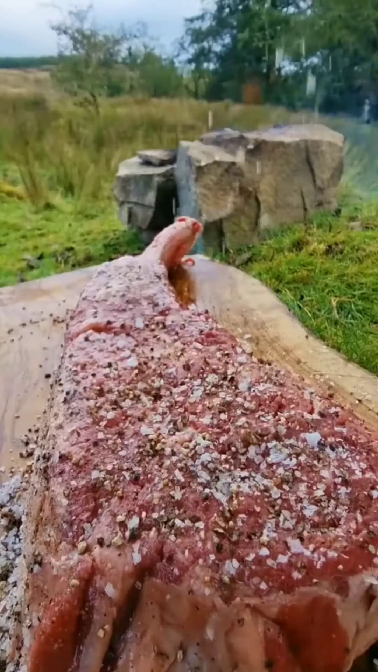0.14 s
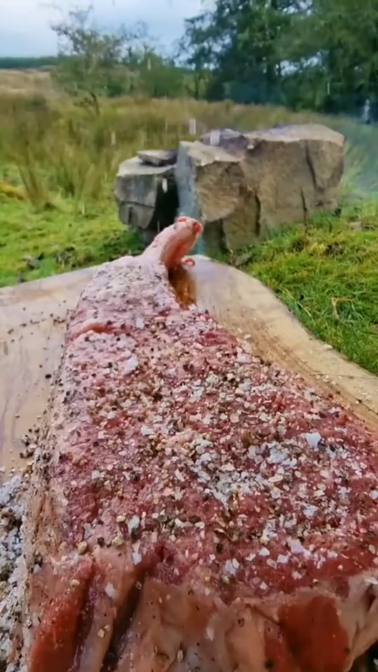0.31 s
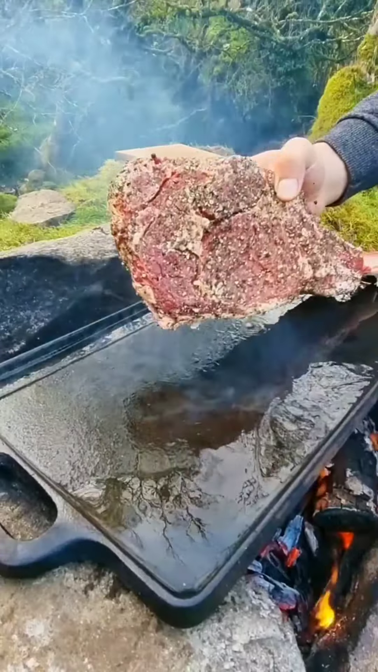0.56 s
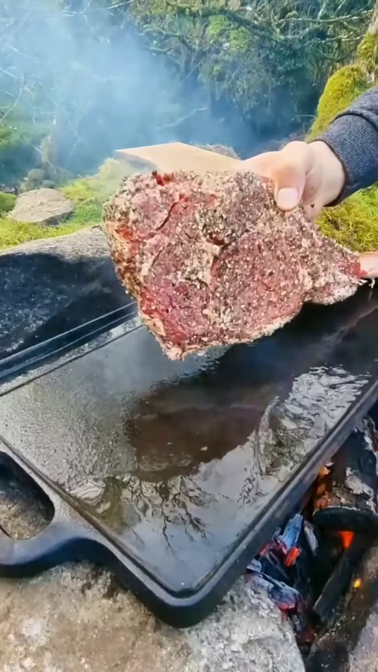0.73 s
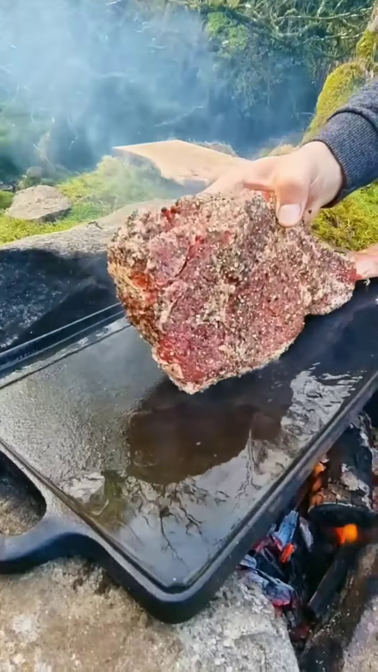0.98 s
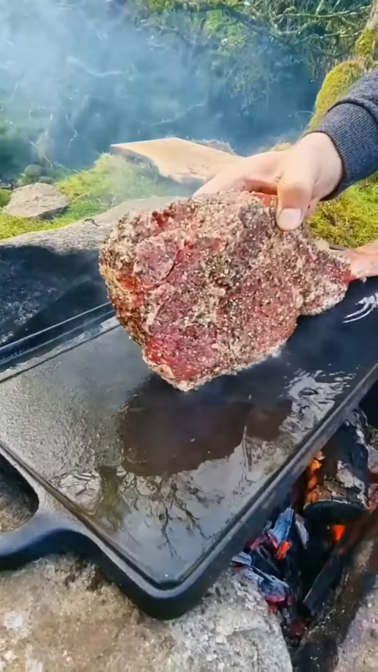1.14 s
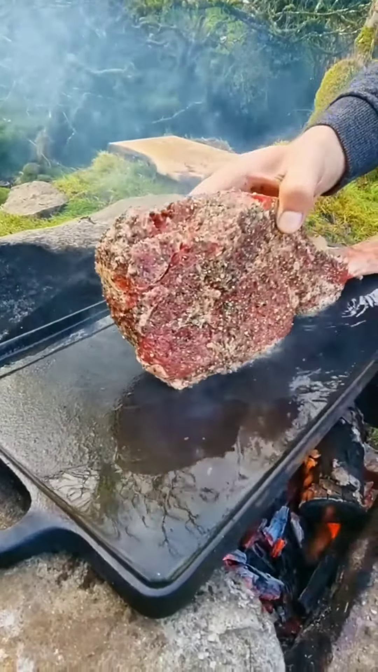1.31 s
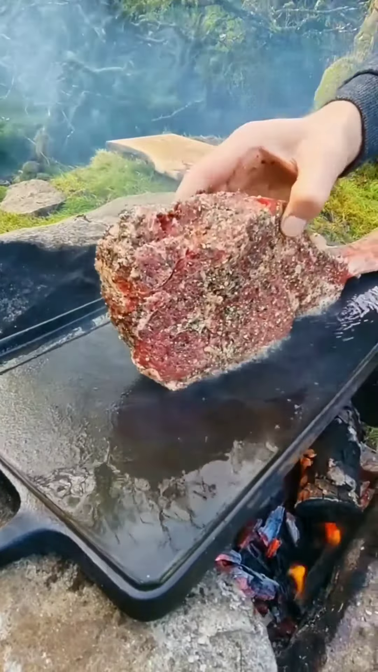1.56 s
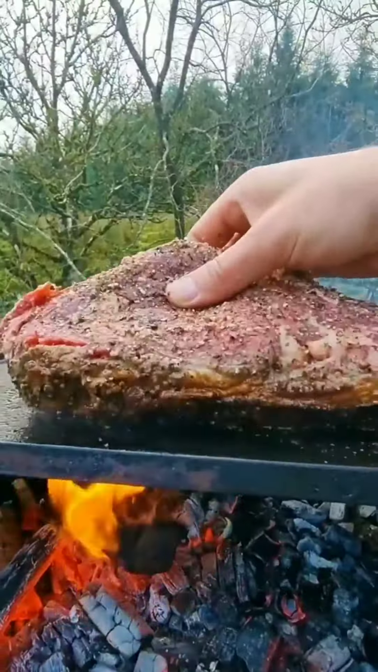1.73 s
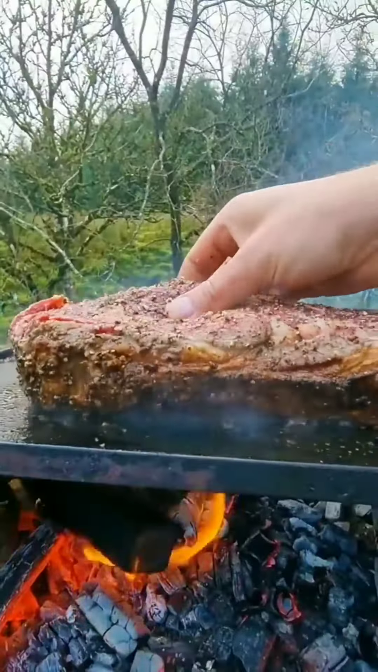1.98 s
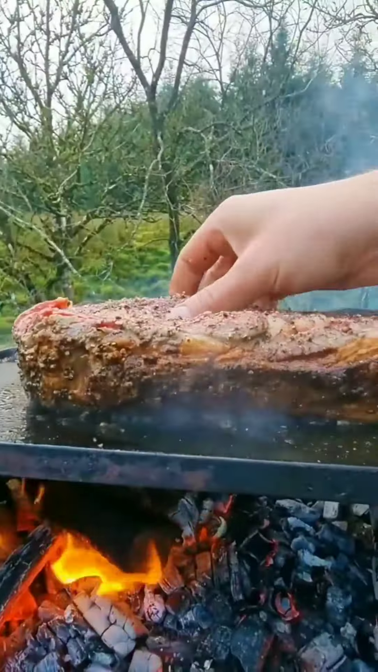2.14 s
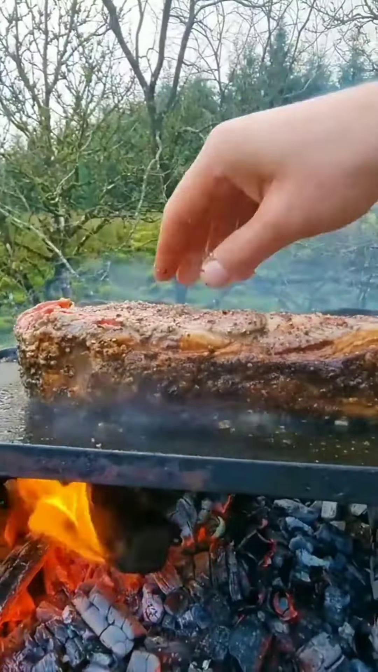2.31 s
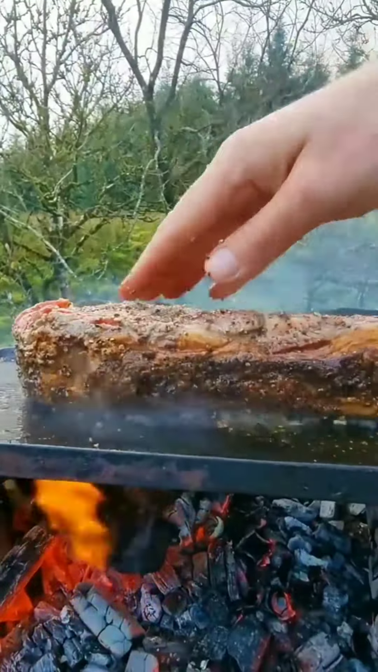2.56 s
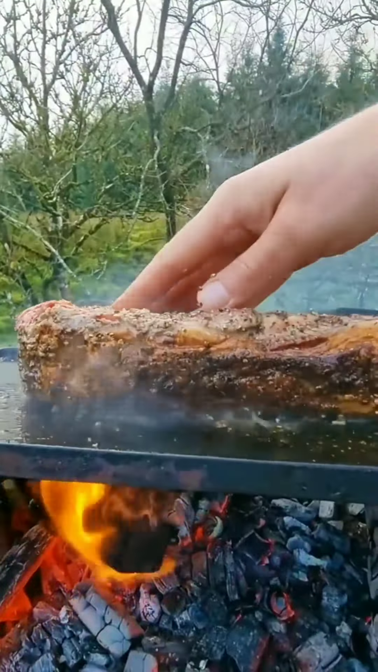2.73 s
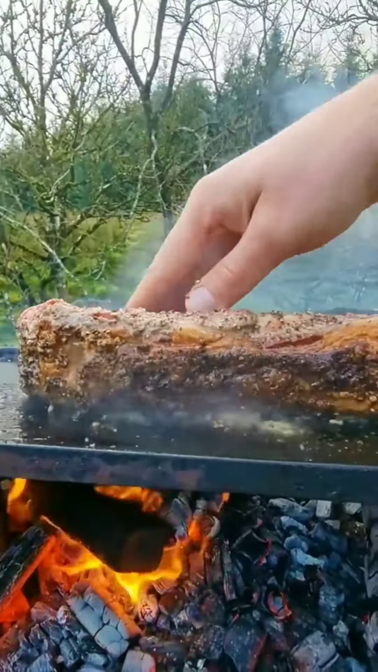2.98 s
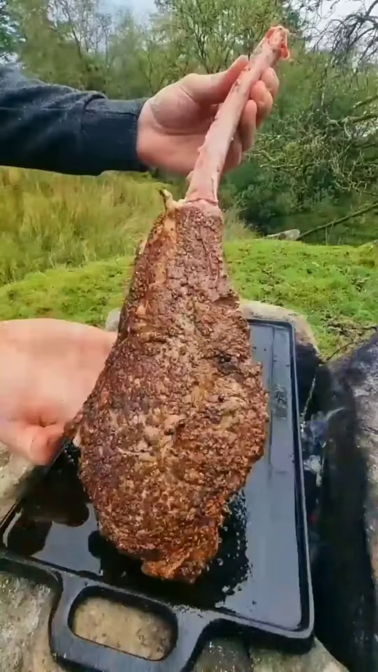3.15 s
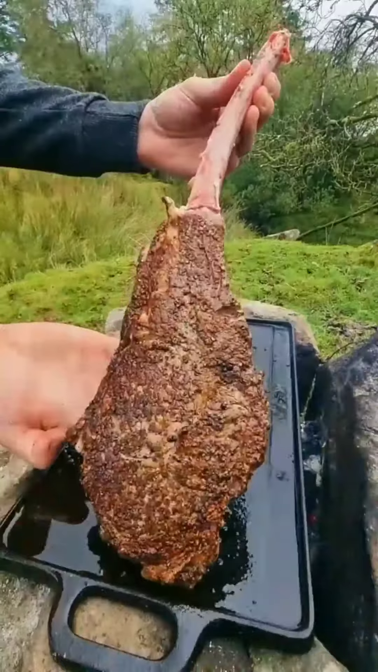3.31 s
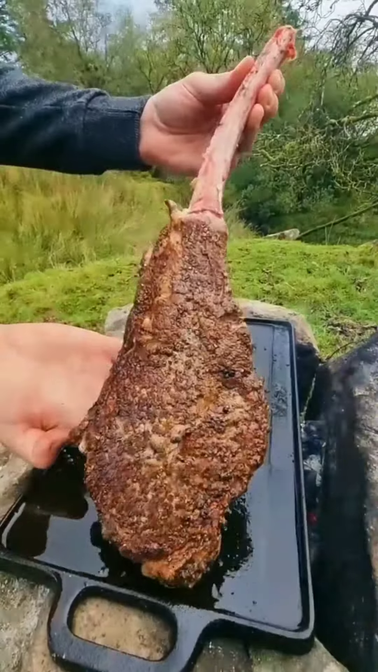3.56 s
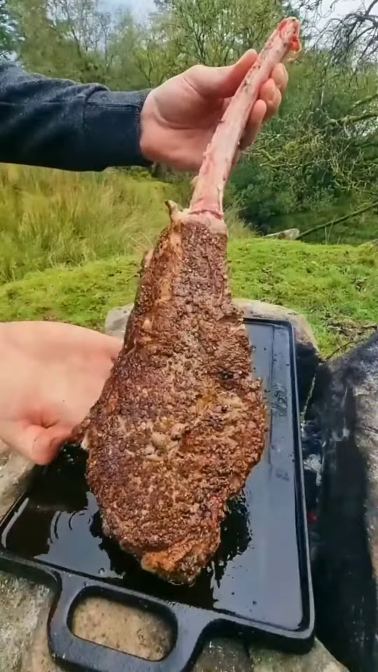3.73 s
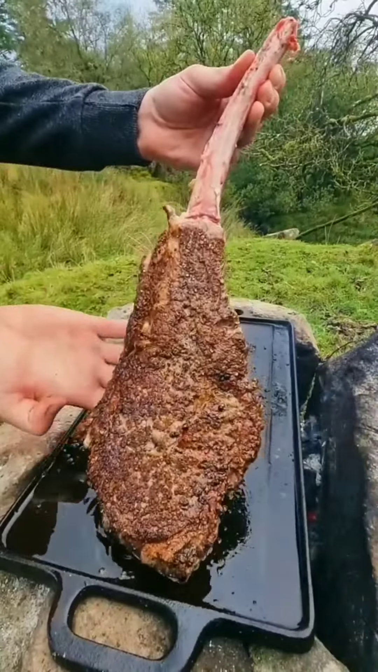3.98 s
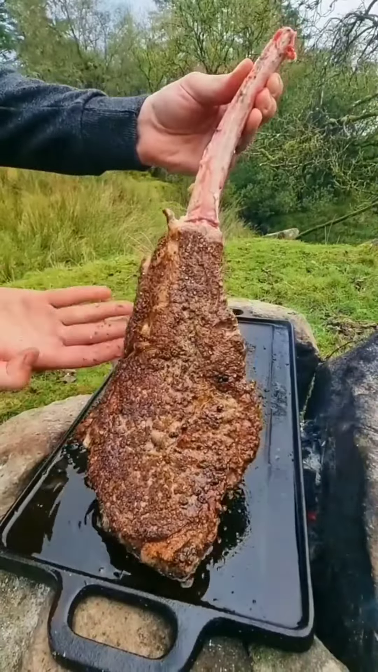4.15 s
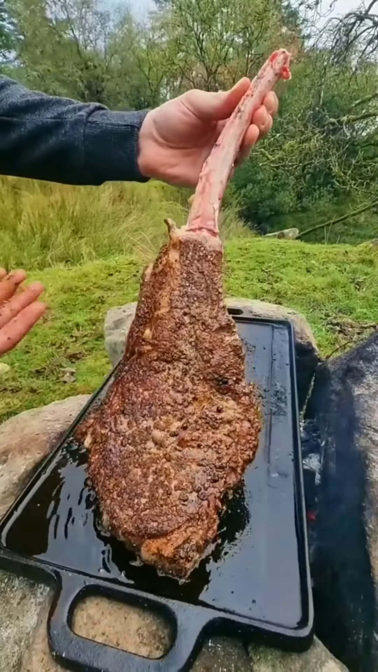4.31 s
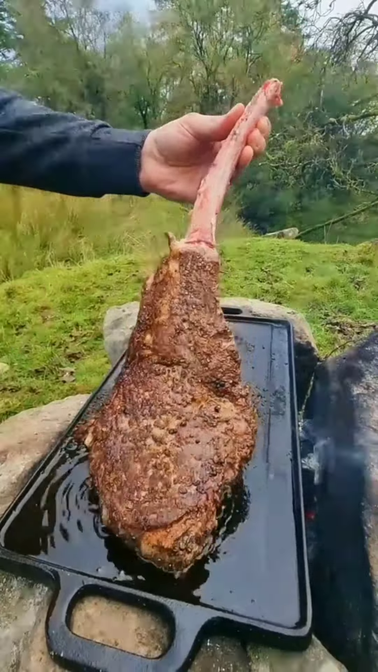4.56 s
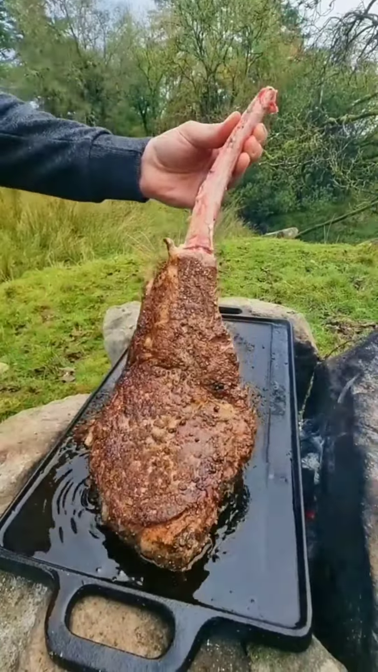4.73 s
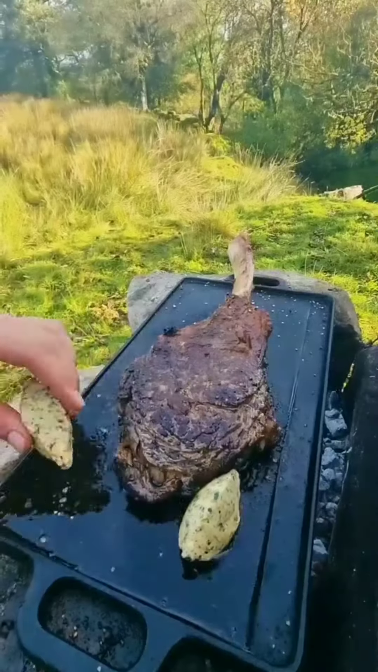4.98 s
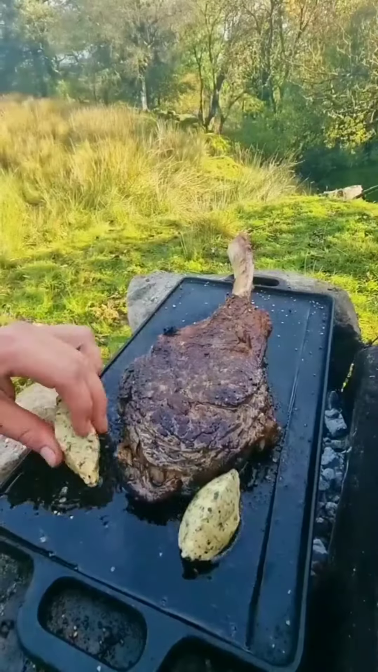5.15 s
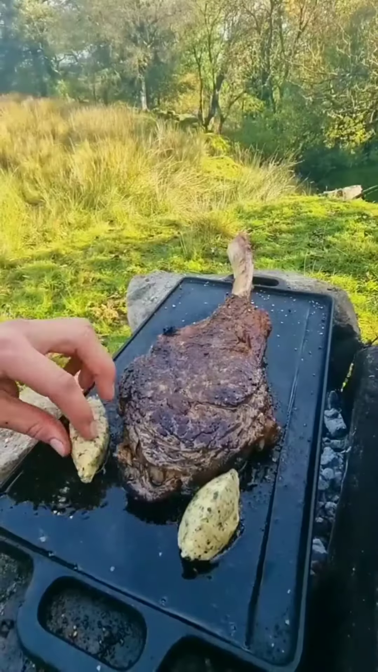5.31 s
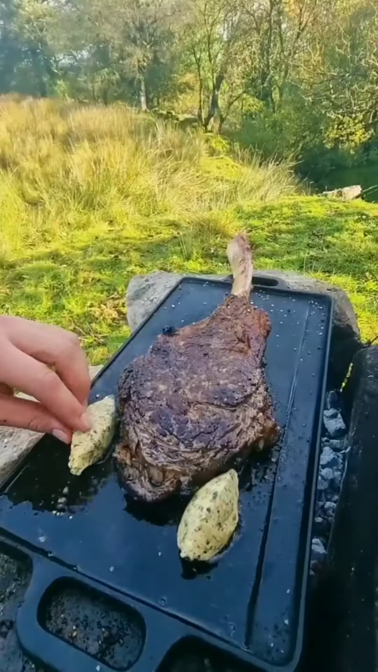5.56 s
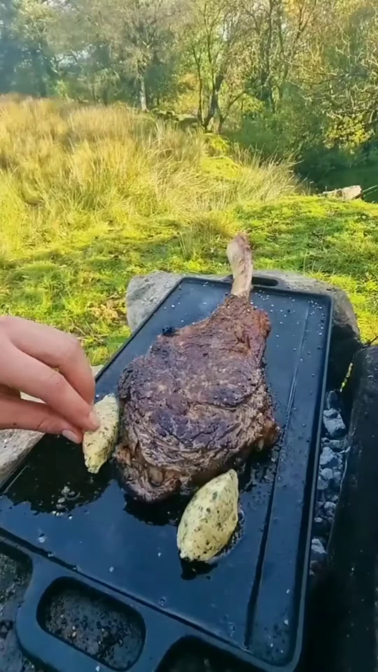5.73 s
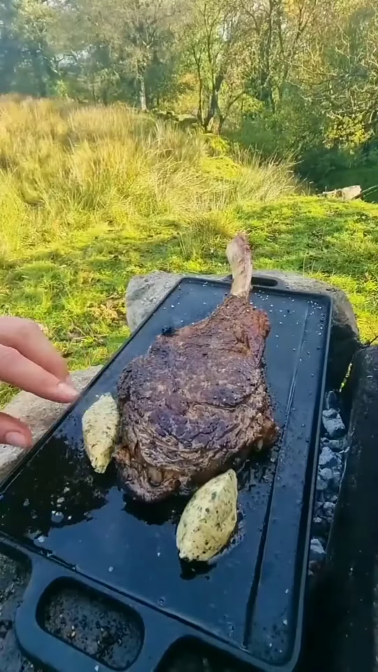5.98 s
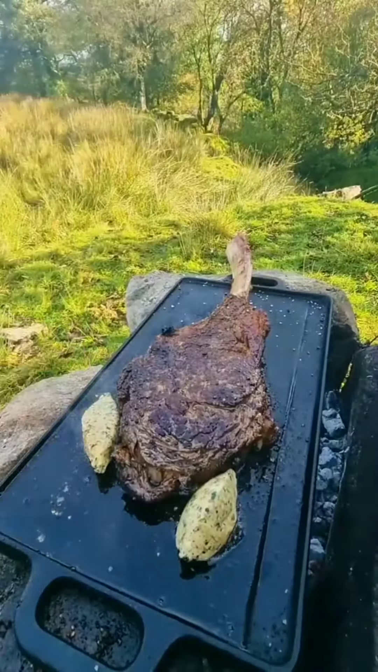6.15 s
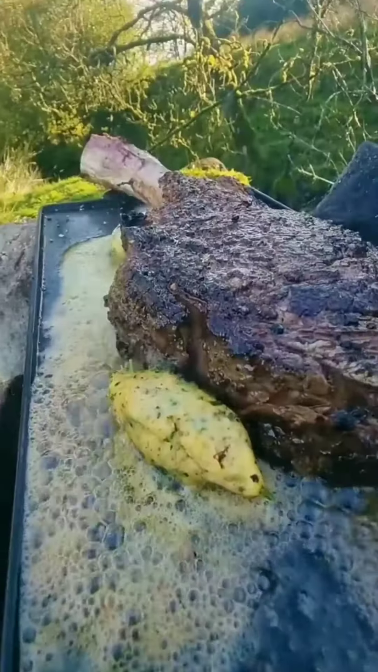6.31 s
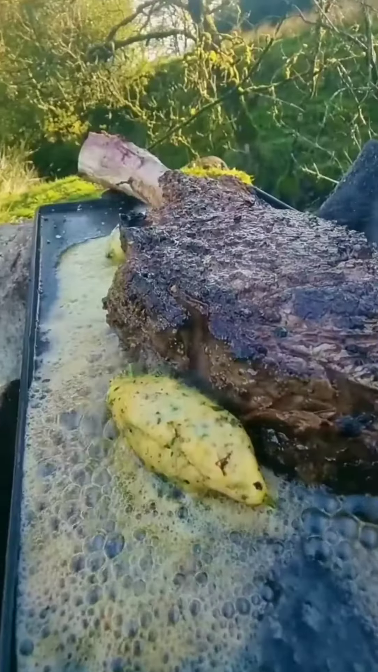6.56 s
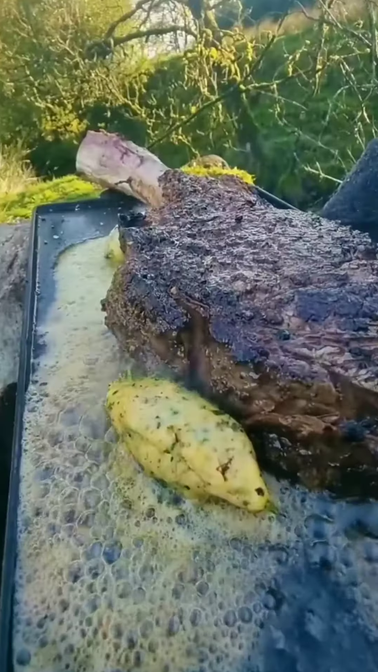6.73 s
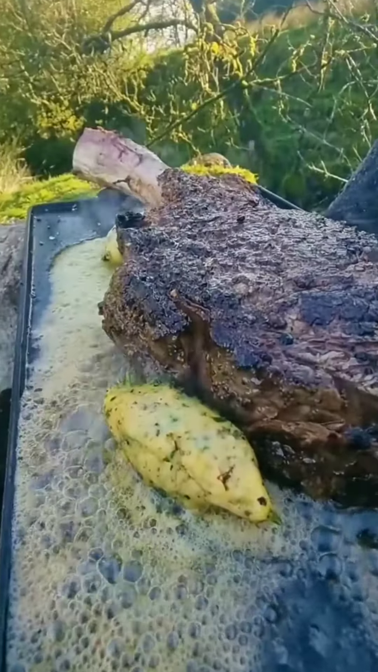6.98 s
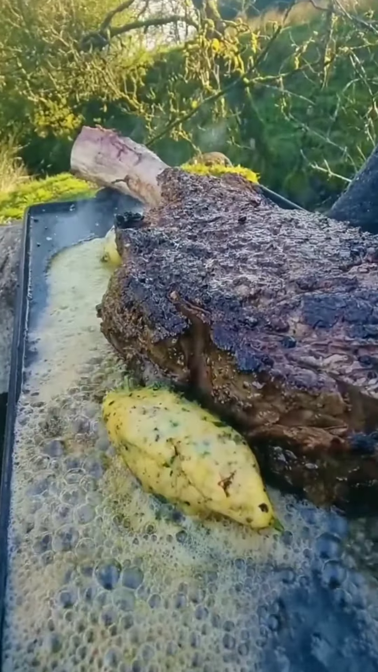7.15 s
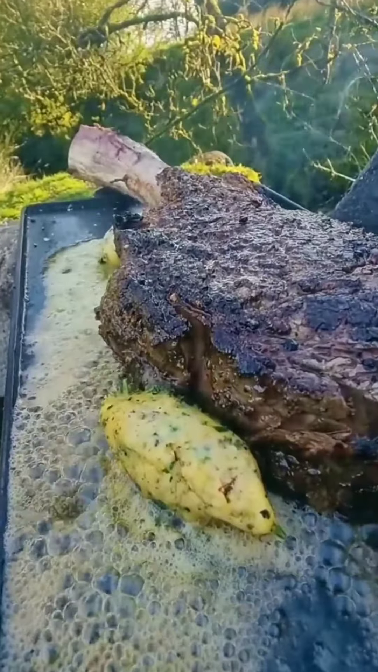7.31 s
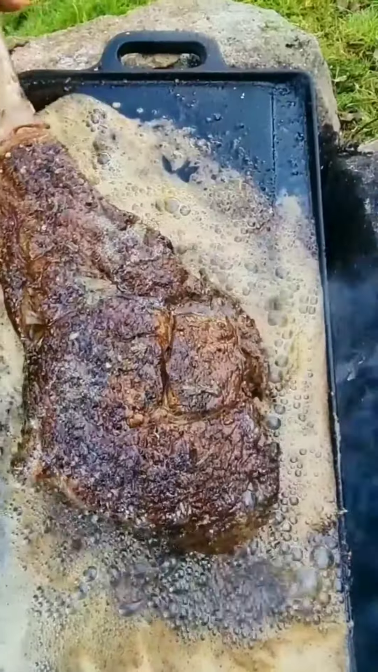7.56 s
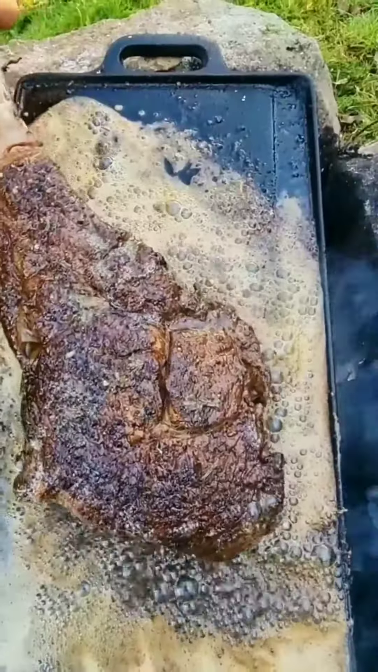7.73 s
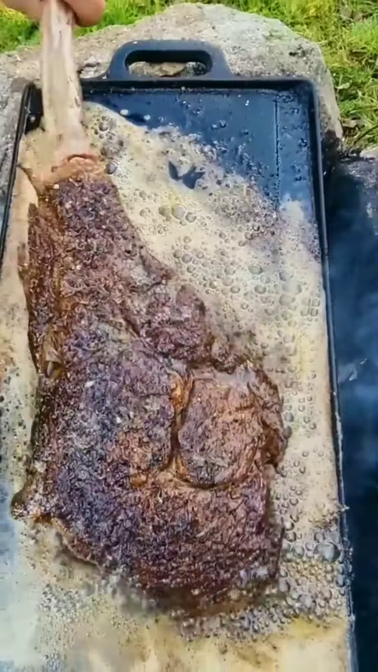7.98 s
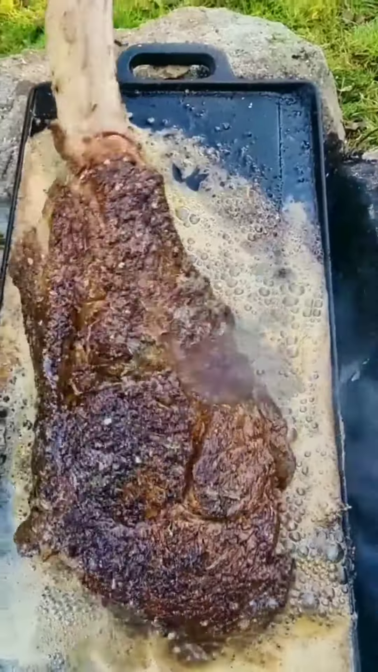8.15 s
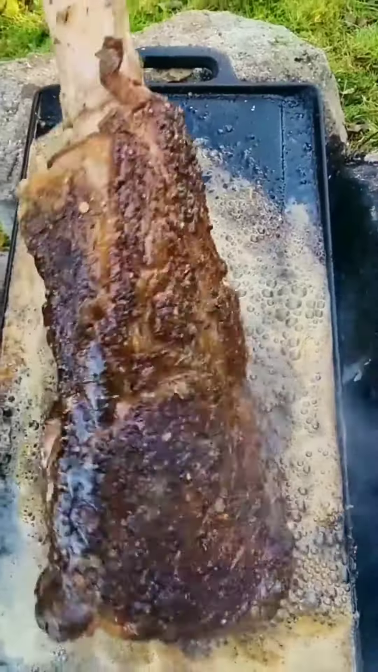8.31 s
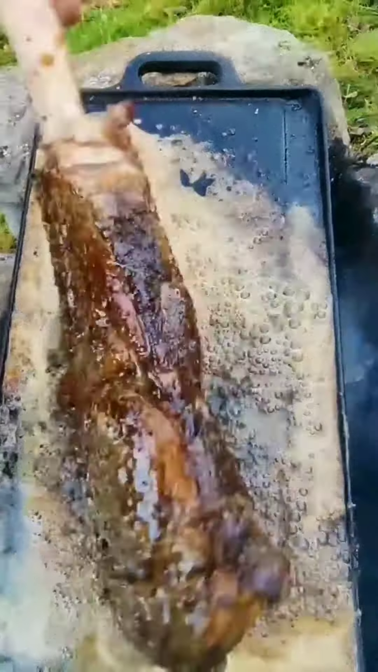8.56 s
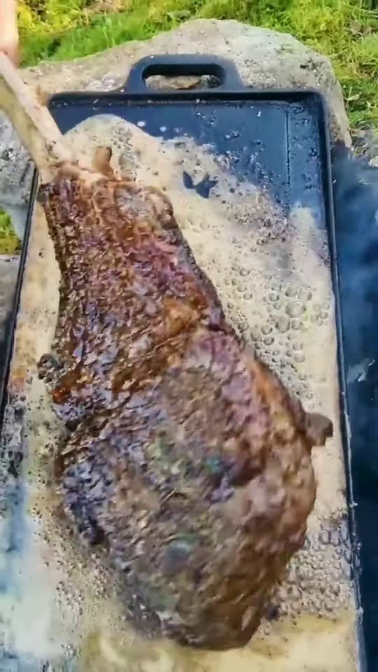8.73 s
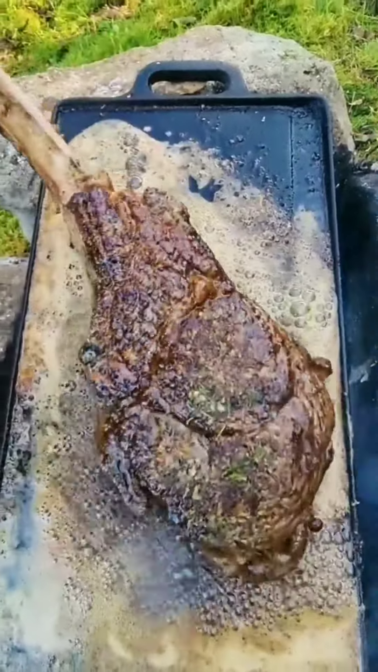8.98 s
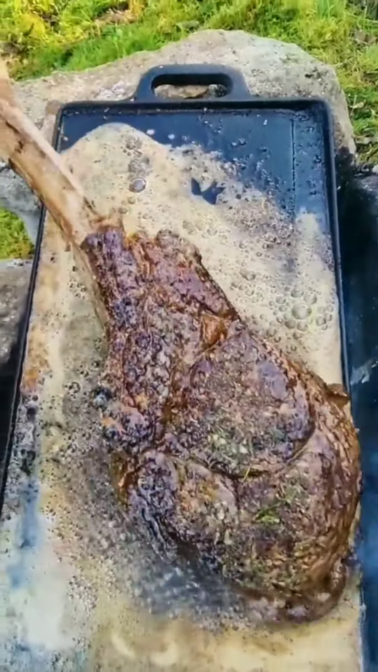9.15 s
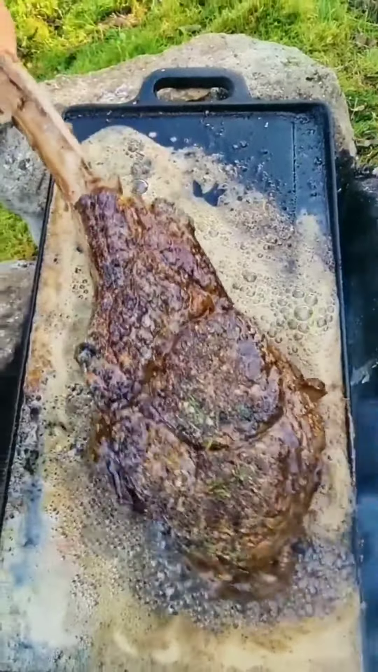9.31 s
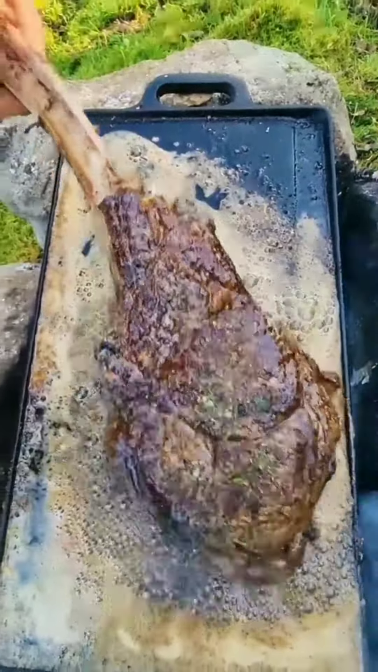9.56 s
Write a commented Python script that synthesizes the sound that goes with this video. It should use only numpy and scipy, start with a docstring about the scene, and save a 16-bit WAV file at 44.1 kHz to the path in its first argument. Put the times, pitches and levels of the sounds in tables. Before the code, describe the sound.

A steak sears on a cast-iron griddle outdoors, heard close up, the tone shifting as the microphone changes position. Salt grains tick lightly at the start, with one soft pat. Oil hisses thinly from 0.4 seconds, and at about 0.9 a loud, dense sizzle takes over. Between 1.7 and 2.9 seconds a hand presses and slaps the meat with several dull thumps while gusts rumble on the microphone. At 3.3 the frying drops to a softer crackle with sharp spits of fat and brief spurts of steam. Around 5 seconds it picks up as butter fries and pops, then eases to a foamy bubbling from 6.4. At 7.5 the sizzle swells again, with more steam spurts as the steak is turned around 8.5, and stays full until the end at about 9.6. A faint distant stream and a light breeze lie underneath.

```python
"""A steak searing on a cast-iron griddle over a wood fire, outdoors, heard on one mono microphone
from several positions in turn. Water boils out of the meat and butter as dense bubble bursts and
spurts of steam, and the fat spits. Salt ticks down before the sear, and a hand presses the meat with
dull thumps. A stream hisses far behind; wind and flame gusts buffet the microphone."""
import sys
import numpy as np
from scipy import signal
from scipy.fft import rfft, irfft
from scipy.io import wavfile
from scipy.ndimage import uniform_filter1d

SR = 44100
rng = np.random.default_rng(int(sys.argv[2]) if len(sys.argv) > 2 else 0)


def waveform_to_disk(signal):
    """Save audio, clipped to [-1, 1], as 16-bit WAV at the path in sys.argv[1]."""
    frames = np.transpose(np.atleast_2d(signal))
    scaled = np.clip(frames, -1, 1) * 32767
    samples = np.round(scaled).astype(np.int16)
    wavfile.write(sys.argv[1], SR, samples)


N = 422919

# The far stream and the wind on the microphone. Each row: frequency in Hz, relative level in dB.
STREAM_SPECTRUM = [(53, -32), (90, 2.5), (237, 3), (350, 3), (434, 0), (776, -1), (1840, -7), (2770, -10.5),
                   (5390, -15.5), (6690, -15), (9860, -29), (12200, -18), (15500, -33)]
WIND_SPECTRUM = [(8.8, -65), (15, -28), (54, 3), (75, 1), (134, -9), (173, -9), (221, -12), (262, -16.5),
                 (450, -24.5), (580, -48), (990, -120)]
# The stream at the microphone. Each row: time in seconds, level in dB.
STREAM_LEVEL = [(0, -41.5), (.385, -43.5), (.86, -46.5), (2.94, -41.5), (3.27, -47.5), (7.4, -46.5),
                (8, -43.5), (9.59, -47.5)]
# Gusts standing out of the breeze. Each row: time of the peak in seconds, level in dB.
MIC_GUSTS = [(.29, -52), (.56, -48), (.77, -39.5), (1.01, -41), (1.36, -38.5), (1.52, -45), (1.68, -27),
             (1.76, -32), (1.84, -31.5), (1.92, -34), (2.0, -26), (2.09, -27), (2.2, -39), (2.305, -27),
             (2.36, -24.5), (2.44, -35), (2.56, -32.5), (2.66, -41), (2.78, -48), (2.875, -27.5),
             (3.0, -40), (3.15, -39.5), (3.44, -52), (3.56, -51), (4.0, -52), (4.43, -50), (4.51, -43.5),
             (4.73, -47), (6.36, -58), (6.57, -47), (6.67, -36.5), (7.18, -47), (7.5, -43.5), (7.66, -48),
             (8.04, -55), (8.39, -38), (8.76, -39), (9.38, -42), (9.48, -40)]
# The hand on meat and board. Each row: start in seconds, thump peak in dB, pitch in Hz,
# slap peak in dB, cycles for the ring to fall 60 dB.
HAND_PATS = [(0.298, -31.5, 336, -40, 25), (1.699, -19, 106, -36, 8.4), (2.003, -19, 68, -31, 6.9),
             (2.11, -25, 75.4, -27, 8.2), (2.359, -10.5, 126, -29, 6.2), (2.739, -39, 113, -13.5, 7.5),
             (2.859, -28.5, 126, -22, 7.5), (6.687, -29, 76, -49, 9.5)]
# Salt landing. Each row: start in seconds, midrange peak in dB, treble peak in dB.
SALT_GRAINS = [(0.0298, -40, -47), (0.031, -28, -46), (0.0947, -35, -51), (0.1027, -29, -51),
               (0.1466, -34, -47), (0.159, -29, -47), (0.22, -29, -51), (0.2404, -31, -49),
               (0.2644, -29, -47)]
# Steam spurts. Each row: start in seconds, decay time in seconds, pitch in Hz,
# breadth (larger rings shorter), level in dB.
STEAM_SPURTS = [(3.737, 0.038, 5120, 500, -28), (4.124, 0.064, 4900, 500, -32),
                (4.278, 0.11, 5000, 500, -32.5), (5.228, 0.022, 2820, 400, -25),
                (5.311, 0.1, 4300, 400, -30), (6.995, 0.045, 4040, 500, -35),
                (7.354, 0.37, 6200, 500, -36.5), (7.58, 0.072, 2000, 600, -32),
                (8.177, 0.075, 4280, 500, -28), (8.626, 0.087, 4000, 400, -35),
                (8.722, 0.064, 3460, 500, -25)]
# The loudest spits of fat. Each row: start in seconds, ring peak in dB, crack level in dB, ring in Hz.
LOUD_SPITS = [(0.656, -27, -32, 5350), (0.7454, -34, -34, 2100), (2.2853, -11, -25, 4730),
              (3.0333, -10, -20, 4910), (3.302, -20, -37, 4540), (3.5015, -21, -34, 4770),
              (3.6492, -17, -28, 3780), (3.7519, -27, -34, 5180), (3.7903, -17, -30, 5100),
              (3.9086, -22, -30, 4920), (4.125, -23, -40, 4830), (4.2365, -28, -34, 4300),
              (4.2568, -22, -34, 4750), (4.5701, -18, -37, 4870), (4.951, -23.5, -25.5, 4300),
              (5.0194, -14, -35, 4100), (5.0784, -20, -34, 4270), (5.3, -12, -26, 4300),
              (5.3904, -14, -30, 4320), (5.6045, -20, -31, 3830), (5.7346, -11, -26, 4120),
              (5.7908, -21, -36, 4080), (5.925, -14, -29, 4250), (6.0353, -18, -35, 4150),
              (6.2897, -12.5, -29, 3020), (6.386, -17, -39, 3670), (6.6733, -20, -46, 3880),
              (6.7322, -20, -43, 3950), (6.8928, -24, -35, 3370), (7.1956, -17, -37, 5990),
              (7.291, -22, -31, 6100), (7.7408, -22, -30, 2410), (9.1006, -20, -30, 3960)]
# Microphone positions at the griddle. Each row: start in seconds, typical bursts per second, size
# spread in dB, surge depth, trims in dB for big bubbles, small bubbles and spray, small spits per
# second, breeze level in dB.
MIC_POSITIONS = [(.385, 4200, 2, 6, -14, -11.5, 3.5, 3, -60),
                 (.86, 9500, 0.22, 0.5, -10.5, -9, 0.3, .3, -53.5),
                 (1.648, 10420, 0.21, 0.4, -9, -1.5, -3, .2, -51), (3.27, 4950, 1, 4, -5, -6.5, 0, 30, -62),
                 (4.95, 5030, 1.3, 1.6, -3.5, -4, -4.5, 26, -64), (6.38, 5550, 1, 1, -4.5, -2, -2, 3, -52),
                 (7.5, 7880, 0.32, 0, -4, -6, -2.5, .4, -56), (8.18, 9870, 0, 0, -7, -3.5, -2, .1, -47.5)]
# Tone of the sizzle, one table for each position. Each row: frequency in Hz, relative level in dB.
OIL_TONE = [(290, -37), (500, -15), (815, -33), (1370, -14), (2970, -20), (3430, -21), (4440, -27),
            (5590, -22), (9650, -27), (12000, -12), (15500, -6)]
LAID_TONE = [(290, -46), (500, -18.5), (863, -20), (997, -11), (1490, -8), (2100, -0.5), (2720, -2.5),
             (4910, -1), (6180, -6.5), (6740, -16), (7670, -13), (8240, -17), (9790, -14.5), (13200, -2.5),
             (15500, -2)]
PRESSED_TONE = [(290, -62), (500, -26), (1030, -18), (1180, -12.5), (1750, -7), (1960, -14), (2690, -6),
                (4310, -6.5), (4840, 0.5), (5430, -7), (7340, -6.5), (9790, -14.5), (12700, -6.5),
                (14800, -10.5), (15500, -12.5)]
TURNED_TONE = [(290, -17), (500, -18), (603, -45), (686, -18), (792, -18), (1130, -6), (1290, -10.5),
               (2460, 4), (3480, -6.5), (5050, -0.5), (6830, -17), (7450, -11), (9240, -12), (14000, -2),
               (15500, -4)]
BUTTER_TONE = [(290, -62), (500, -24.5), (666, -18), (901, -13.5), (1990, -1.5), (2840, -0.5), (3480, -5.5),
               (4130, 3), (5280, -6), (6180, -11.5), (6830, -21.5), (10800, -19), (12700, -10.5),
               (14200, -12), (15500, -15.5)]
FOAM_TONE = [(290, -53), (500, -32), (594, -22), (657, -28), (781, -13.5), (1030, -4.5), (1410, -15),
             (1720, -8.5), (2200, -1.5), (3380, 2.5), (5130, -3), (6640, -3.5), (10500, -17.5),
             (12900, -10), (15500, -14)]
BASTED_TONE = [(290, -46), (500, -17), (638, -13.5), (781, -16.5), (1150, -5.5), (1330, -7), (1820, -1),
               (2390, 0.5), (3100, -2), (4130, 0.5), (6640, -7.5), (8980, -7), (11100, -12), (14200, -5),
               (15500, -8.5)]
FLIPPED_TONE = [(290, -42), (500, -17), (748, -12.5), (982, -12), (1130, -7.5), (1390, -7.5), (2330, 2.5),
                (3060, 0.5), (3380, -2), (4130, -0.5), (6740, -8.5), (8980, -9), (11300, -13.5),
                (13600, -7.5), (15500, -6)]
# Sizzle layers: big bubbles, small bubbles, fine spray. Each row: one layer's band edges in Hz.
LAYER_BANDS = [
    [450, 800, 1200, 1700, 2400, 3300],
    [3300, 4200, 5300, 6500],
    [6500, 8500, 11000, 13000, 16500],
]
# Vigour of the frying. Each row: time in seconds, base level in dB, tilt from bubbles towards spray.
FRYING_VIGOUR = [(.385, -53, -6), (.46, -40, 2.5), (.58, -44.5, 2), (.62, -36, 0.5), (.68, -37, -1),
                 (.83, -40, -3), (.87, -31, 6), (.942, -21, 3.5), (1.02, -19.5, 0.7), (1.516, -17.5, 0.5),
                 (1.64, -21, 2), (1.74, -21, -1), (1.84, -15, -0.7), (1.97, -14.5, -0.2), (2.545, -18, 0.5),
                 (3.169, -18, -0.7), (3.19, -22, 1.5), (3.259, -25, -.3), (3.275, -40.5, -3),
                 (3.42, -38.5, -0.5), (3.578, -34, 1), (4.1, -35.5, -2.5), (4.22, -34, -1),
                 (4.3, -30.5, -1.5), (4.55, -31.5, -2), (4.94, -32, -1.2), (5, -27, 2.2), (5.364, -27, 1.5),
                 (6.32, -27.5, 2), (6.41, -34.5, 1), (6.78, -37.5, -1.5), (6.994, -32.5, 0.5),
                 (7.474, -30, 2.5), (7.53, -24, 1), (7.624, -21, -0.8), (7.98, -23, -0.8), (8.18, -20.5, 3),
                 (8.3, -21.5, 2), (8.49, -19, 3), (8.64, -24, -1.5), (8.84, -21, 2), (9, -22, 0.5),
                 (9.23, -23.5, 0), (9.31, -21.5, 1), (9.59, -25, 0)]
# Flare-ups of the fat. Each row: time in seconds, lift of the small bubbles in dB, of the spray in dB.
FAT_FLARES = [(.53, 7, 4), (.61, 5, 4), (.66, 1, 3), (3.15, -1.3, 3), (3.301, 5, -1), (3.56, 4.5, 3),
              (3.685, -0.5, 10.5), (3.77, -4, 9), (4.07, 1, 2), (4.17, 5, 1), (4.29, 4, 1),
              (4.59, 3.5, 1.2), (4.69, -3, 0.5), (4.908, -2, 7), (5.24, 0, 1), (5.33, -2, 3.5),
              (5.41, 1, -1.5), (5.49, -0.5, 3), (5.61, 5, 0), (5.69, 5, 1), (5.735, 0, 0.5), (5.84, 0, 3),
              (5.92, 5, 1), (6.02, 3, 2), (6.1, 3, -1.5), (7.02, 3.5, -3), (8.2, 2.5, -0.5)]

GUST_RISE_DB_PER_S, GUST_FALL_DB_PER_S, BREEZE_SWAY_DB = 302, 162, 2.5
FLARE_RISE_S, FLARE_FALL_S = 0.0097, 0.016
CROSSFADE_S, CUTOFF_HZ = 0.0045, 15730


def amp(db):
    """dB to gain."""
    return 10 ** (np.asarray(db) / 20)


def rms_one(x):
    """Scale to rms 1."""
    return x / np.sqrt(np.mean(x ** 2) + 1e-20)


def at_peak(x, db):
    """Scale to a peak level."""
    return amp(db) * x / np.abs(x).max()


def in_time(rows):
    """Columns of a curve table, one value a sample."""
    times, *columns = np.transpose(rows)
    return [np.interp(np.arange(N) / SR, times, c) for c in columns]


def position_settings():
    """Settings of the current microphone position, one value a sample."""
    table = np.array(MIC_POSITIONS)
    current = np.searchsorted(np.round(table[:, 0] * SR), np.arange(N), "right") - 1
    return table[np.maximum(current, 0), 1:].T


def drift(rate_hz, gain_db=None):
    """Slow random wander of spread 1 or, given a spread in dB, a wavering gain."""
    pole = np.exp(-2 * np.pi * rate_hz * 40 / SR)  # one step every 40 samples
    noise = rng.standard_normal(N // 40 + 2002)
    slow = rms_one(signal.lfilter([1], [1, -2 * pole, pole * pole], noise)[2000:])
    slow = slow if gain_db is None else amp(gain_db * slow)
    return np.interp(np.arange(N) / 40, np.arange(len(slow)), slow)


def shaped(x, spectrum, low=0., high=SR, size=4096):
    """Give x a spectrum between two soft edges in Hz, with a minimum-phase filter."""
    hz = np.maximum(np.arange(size // 2 + 1), .5) * SR / size
    points_hz, points_db = np.transpose(spectrum)
    gain = amp(np.interp(np.log(hz), np.log(points_hz), points_db))
    gain = gain / np.sqrt((1 + (low / hz) ** 14) * (1 + (hz / high) ** 14)) + 1e-7
    cepstrum = irfft(np.log(gain))
    cepstrum[1:size // 2] *= 2
    cepstrum[size // 2 + 1:] = 0
    impulse = irfft(np.exp(rfft(cepstrum)))
    return signal.oaconvolve(x, impulse)[:len(x)]


def filtered(x, hz, kind="band", order=2):
    """Band-pass or high-pass x."""
    return signal.sosfilt(signal.butter(order, hz, kind, fs=SR, output="sos"), x)


def ring(x, hz, t60):
    """A resonance that falls 60 dB in t60 seconds."""
    r, w = amp(-60 / (t60 * SR)), 2 * np.pi * hz / SR
    return signal.lfilter([0, np.sin(w)], [1, -2 * r * np.cos(w), r * r], x)


def place(out, start_s, sound):
    """Mix a sound in at its start time."""
    at = round(start_s * SR)
    out[at:at + len(sound)] += sound


def stream():
    """Running water far behind the griddle: smooth noise, barely wavering."""
    water = rng.standard_normal(N) * drift(13, 1.6)
    return amp(in_time(STREAM_LEVEL)[0]) * rms_one(shaped(water, STREAM_SPECTRUM))


def wind():
    """Rumble right on the microphone: a swaying breeze, and gusts that hit fast and ease off slower."""
    rumble = shaped(rng.standard_normal(N), WIND_SPECTRUM, high=360, size=8192)
    rumble /= uniform_filter1d(rumble ** 2, size=SR // 16) ** 0.84  # ducks its own chance swells
    t = np.arange(0, N, 40) / SR
    gust_power = np.zeros(len(t))
    for peak_s, peak_db in MIC_GUSTS:
        drop_db = np.maximum(GUST_RISE_DB_PER_S * (peak_s - t), GUST_FALL_DB_PER_S * (t - peak_s))
        gust_power += amp(peak_db - drop_db) ** 2
    breeze_db = uniform_filter1d(position_settings()[7], size=SR // 30)
    breeze = amp(breeze_db + BREEZE_SWAY_DB * drift(6))
    return np.sqrt(np.interp(np.arange(N) / SR, t, gust_power) + breeze ** 2) * rms_one(rumble)


def hand_pats():
    """A soft push of the hand sets off a damped low ring, with a short slap of skin on top."""
    out, t = np.zeros(N), np.arange(4000) / SR
    for start, thump_db, hz, slap_db, cycles in HAND_PATS:
        thump = ring(t * np.exp(-t * hz * 15), hz, cycles / hz)
        slap = filtered(rng.standard_normal(len(t)) * np.exp(-t / 0.0058), [400, 2100])
        place(out, start, at_peak(thump, thump_db) + at_peak(slap, slap_db))
    return out


def salt():
    """Hard grains tick on meat and board, each a broad crack of a millisecond or two."""
    out, t = np.zeros(N), np.arange(600) / SR
    for start, mid_db, treble_db in SALT_GRAINS:
        tick = rng.standard_normal(len(t)) * np.exp(-t / 0.00099)
        mid = filtered(tick, [2200, 7000])
        treble = filtered(tick, 7000, "high", order=4)
        place(out, start, at_peak(mid, mid_db) + at_peak(treble, treble_db))
    return out


def steam_spurts():
    """Narrow jets of steam: noise through one resonance, quick to swell and slower to die."""
    out, t = np.zeros(N), np.arange(SR // 2) / SR
    for start, decay_s, hz, breadth, level_db in STEAM_SPURTS:
        swell = np.minimum(t / 0.011, 1) * np.exp(-(t / decay_s) ** 2)
        jet = rms_one(ring(rng.standard_normal(len(t)), hz, t60=5.2 / breadth))
        place(out, start, amp(level_db) * swell * jet)
    return out


def small_spits(slot=400, spread_db=17.5, low_hz=2000, high_hz=4900):
    """Random rows like LOUD_SPITS, at each position's rate and scattered about the frying's level."""
    chance, offset, strength, pitch = rng.random((N // slot, 4)).T  # at most one spit a slot
    at = np.arange(len(chance)) * slot + (offset * (slot - 1)).astype(int)
    vigour_db = in_time(FRYING_VIGOUR)[0][at]
    ring_db = vigour_db - 2 + spread_db * (2 * strength - 1)
    crack_db = vigour_db - 7 + spread_db * (pitch - strength)
    hz = low_hz * (high_hz / low_hz) ** pitch
    per_s = position_settings()[6][at]
    fires = (chance < per_s * slot / SR) & (at > MIC_POSITIONS[0][0] * SR)
    return list(np.transpose([at / SR, ring_db, crack_db, hz])[fires])


def fat_spits():
    """Fat spits off the iron: a rough ring plus a bright crack, over in milliseconds."""
    out, t = np.zeros(N + 600), np.arange(600) / SR
    for start, ring_db, crack_db, hz in list(LOUD_SPITS) + small_spits():
        rough, fizz = rng.standard_normal((2, len(t)))
        body = ring(rough * np.exp(-t / .0007), hz, t60=.003)
        crack = filtered(fizz, [10500, 15500]) * np.exp(-t / .0012)
        crack /= np.std(crack[:90])  # unit level over the first 2 ms
        place(out, start, at_peak(body, ring_db) + amp(crack_db) * crack)
    return filtered(out[:N] + 1e-18, 1300, "high")


def steam_vents(puff_db, rate_hz, count):
    """Steam leaks through many small gaps: narrow noise bands puff separately, the treble least."""
    white, out = rng.standard_normal((2, N)), np.zeros(N)
    edges = np.geomspace(2500, 18000, count + 1) - 2050  # narrower in the bass
    for k, band in enumerate(zip(edges, edges[1:])):
        puff = drift(rate_hz, puff_db * (1 - 0.6 * k / count))
        out += puff * filtered(white[k % 2], band)
    return rms_one(out)


def fat_flares():
    """Lift in dB of bubbles and of spray as the fat flares for a few hundredths of a second."""
    t, out = np.arange(-4000, 4000) / SR, np.zeros((2, N))
    swell = np.exp(-.5 * (t / np.where(t < 0, FLARE_RISE_S, FLARE_FALL_S)) ** 2)
    for peak_s, *lift_db in FAT_FLARES:
        at = round(peak_s * SR) - len(t) // 2
        out[:, at:at + len(t)] += np.outer(lift_db, swell)
    return out


def from_positions(bands, edges):
    """One sizzle layer in the tone of each microphone position, cross-faded at constant power."""
    tones = [OIL_TONE, LAID_TONE, PRESSED_TONE, TURNED_TONE,
             BUTTER_TONE, FOAM_TONE, BASTED_TONE, FLIPPED_TONE]
    starts = [round(row[0] * SR) for row in MIC_POSITIONS] + [N]
    layer, fade = np.zeros(N), round(CROSSFADE_S * SR)
    for tone, start, stop in zip(tones, starts, starts[1:]):
        at = np.arange(start, min(stop + fade, N))
        part = sum(shaped(band[at], tone, low, high, size=1024)
                   for band, low, high in zip(bands, edges, edges[1:]))
        ramp = np.minimum(at - start, stop + fade - at) / fade
        layer[at] += np.sqrt(np.clip(ramp, 0, 1)) * rms_one(part)
    return layer


def sizzle():
    """Water boils out of the steak: bubble bursts of uneven size over steam, surging band by band."""
    per_s, spread_db, surge_depth, big_db, small_db, spray_db = position_settings()[:6]
    bubble_lift, spray_lift = fat_flares()
    vigour_db, tilt = in_time(FRYING_VIGOUR)
    levels_db = vigour_db + np.array([big_db + .5 * bubble_lift - 0.91 * tilt,
                                      small_db + bubble_lift - 1.07 * tilt,
                                      spray_db + spray_lift + 0.42 * tilt])
    bursting = rng.random(N) < per_s * drift(70, 2.2) / SR  # bursts come in clumps
    bursts = bursting * amp(spread_db * np.minimum(rng.exponential(1, N), 5.2))
    bursts /= np.sqrt(uniform_filter1d(bursts ** 2, size=SR // 2) + 1e-9)
    shared_surge = 0.17 * drift(4.3) + 0.094 * drift(18)
    steam = steam_vents(puff_db=4.55, rate_hz=5.1, count=48)
    out = np.zeros(N)
    for edges, level_db in zip(LAYER_BANDS, levels_db):
        layer_surge, bands = 0.15 * drift(24), []
        for _ in edges[1:]:
            clicks = bursts * np.sign(rng.random(N) - .5)
            surge = shared_surge + layer_surge + 0.62 * drift(11)
            bands.append((clicks + 1.15 * steam) * amp(surge_depth * surge))
        layer = from_positions(bands, edges)
        power = uniform_filter1d(layer ** 2, size=SR // 7) + 1e-9
        out += amp(level_db) * layer / power ** 0.49  # evened out, so level_db sets the slow swells
    return out


def scene():
    """The griddle, the far stream and the wind on one microphone, the same on both channels."""
    cooking = sizzle() + fat_spits() + steam_spurts() + salt() + hand_pats()
    return np.tile(cooking + stream() + wind(), (2, 1))


def record(dry):
    """The recorder rounds the peaks and cuts the top treble steeply."""
    rounded = 1.5 * np.tanh(dry / 1.5)
    return signal.sosfilt(signal.cheby2(30, 90, CUTOFF_HZ, fs=SR, output="sos"), rounded)


dry = scene()
out = record(dry)
waveform_to_disk(out)
```